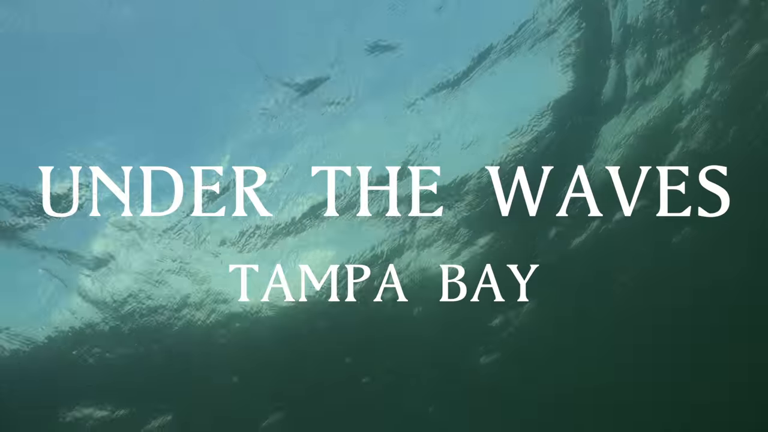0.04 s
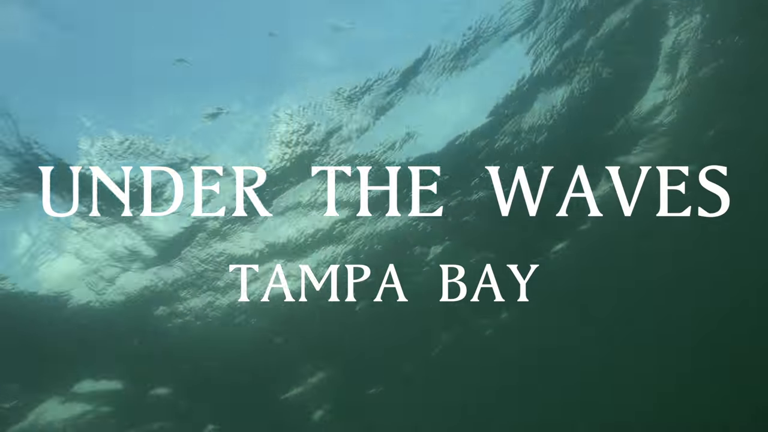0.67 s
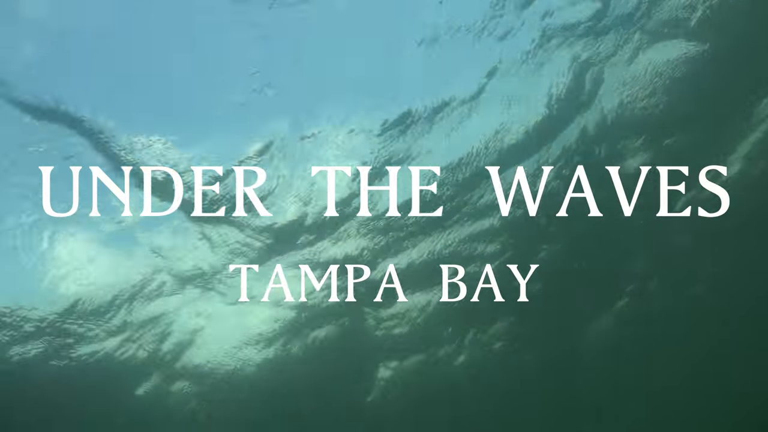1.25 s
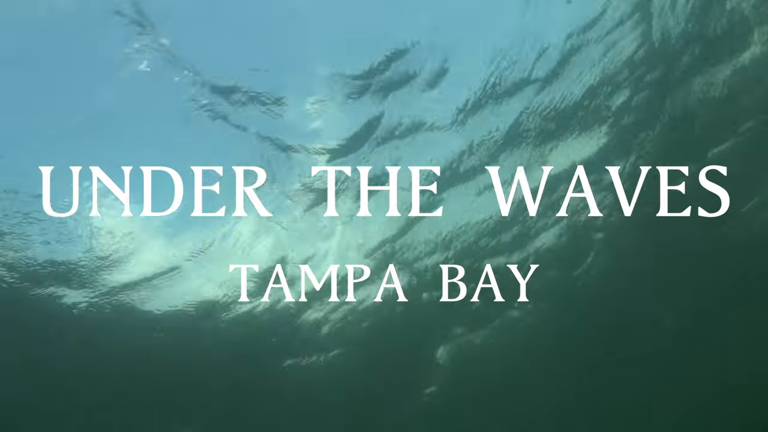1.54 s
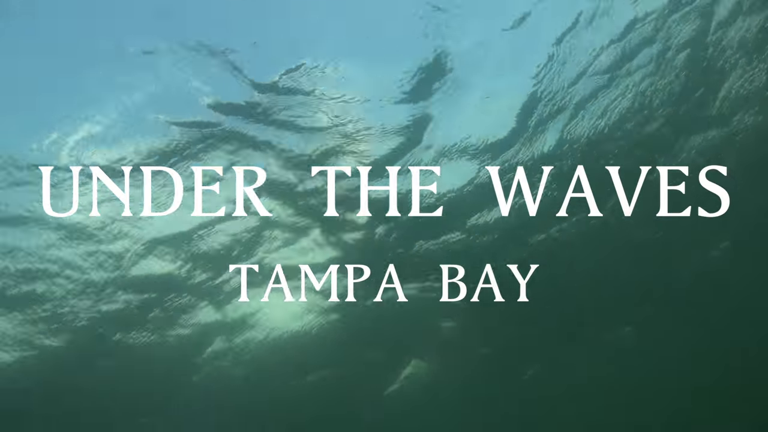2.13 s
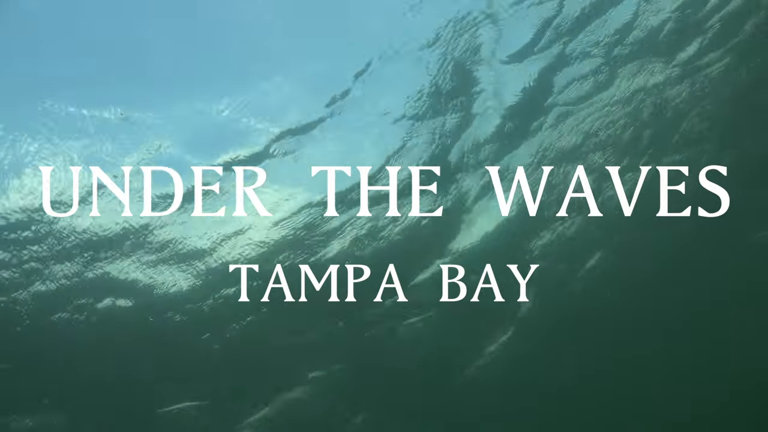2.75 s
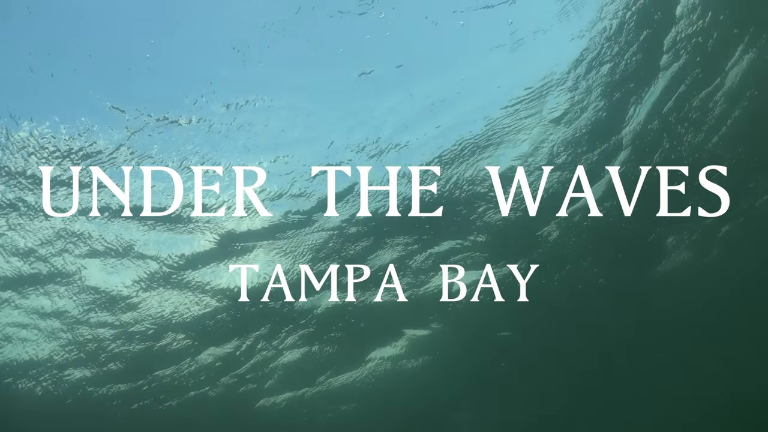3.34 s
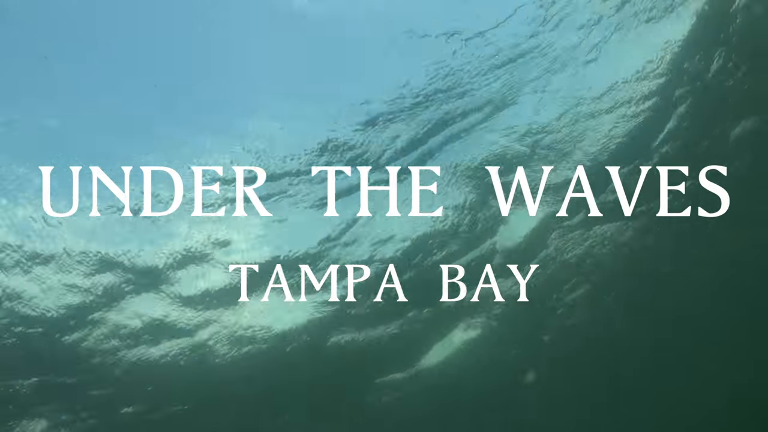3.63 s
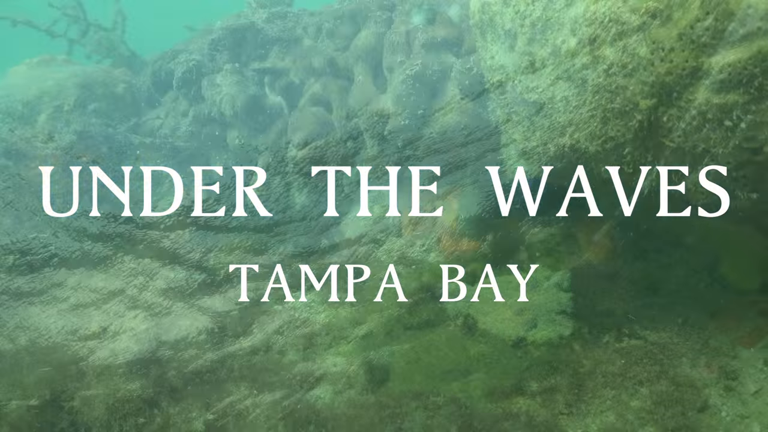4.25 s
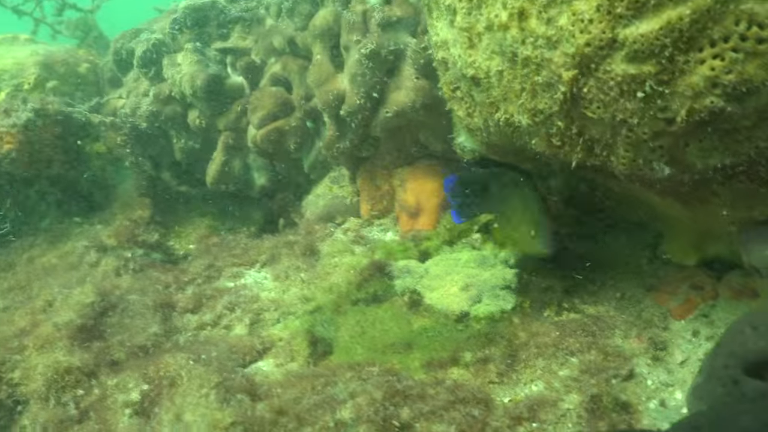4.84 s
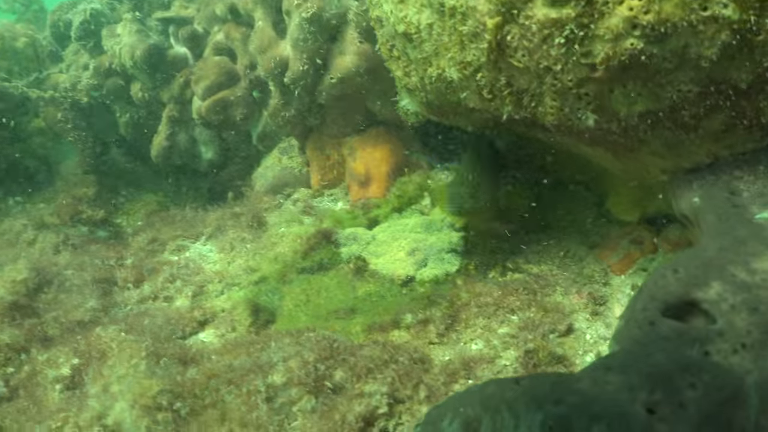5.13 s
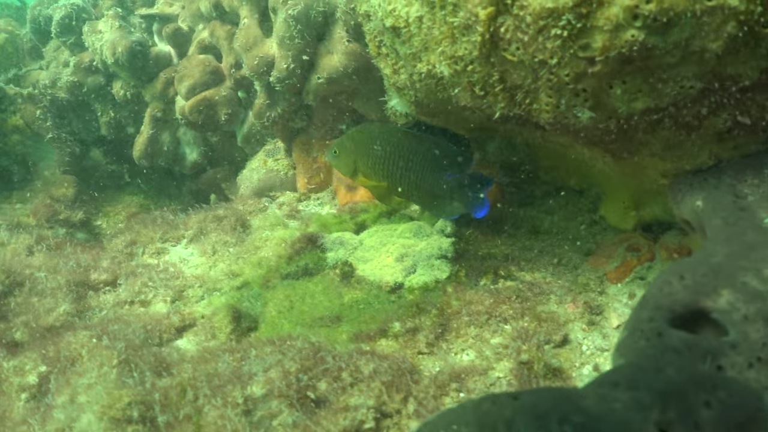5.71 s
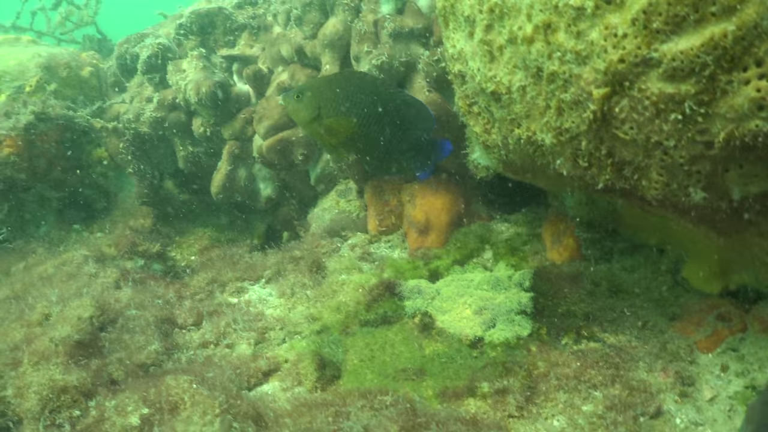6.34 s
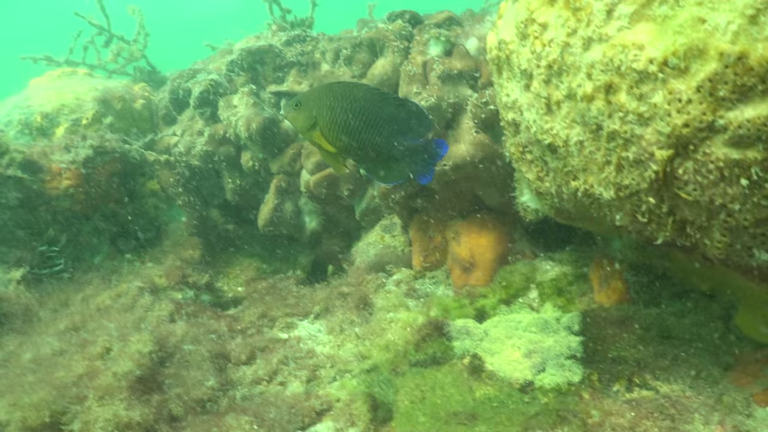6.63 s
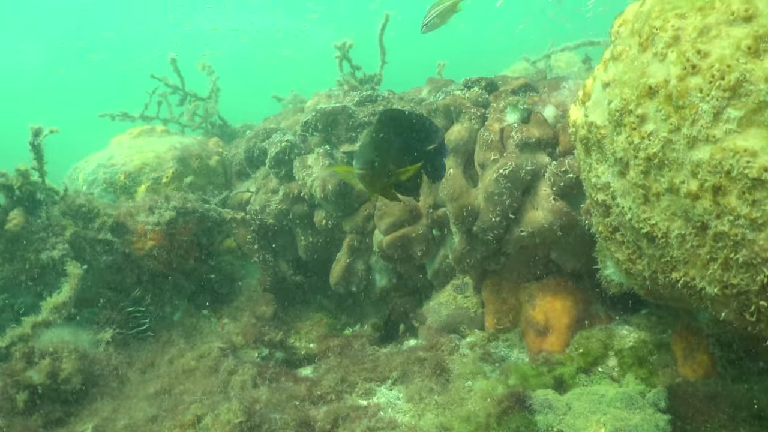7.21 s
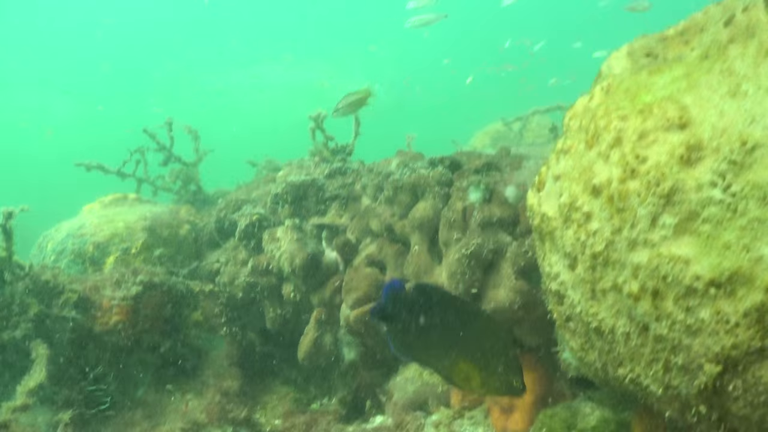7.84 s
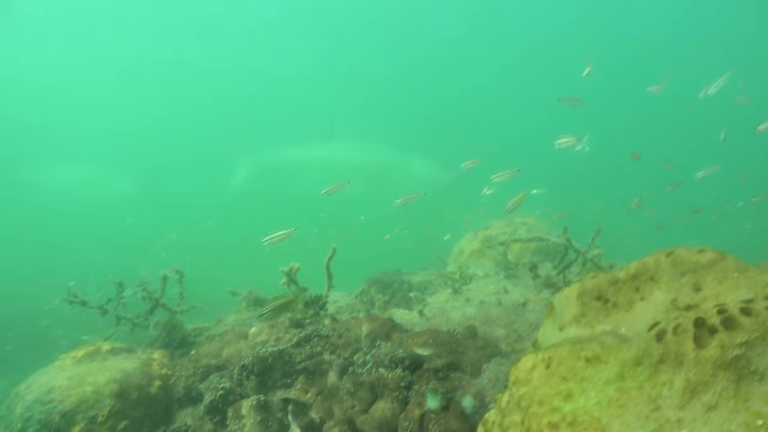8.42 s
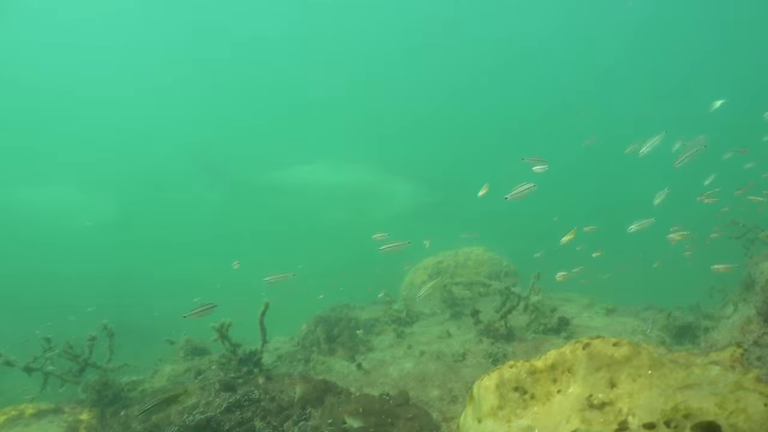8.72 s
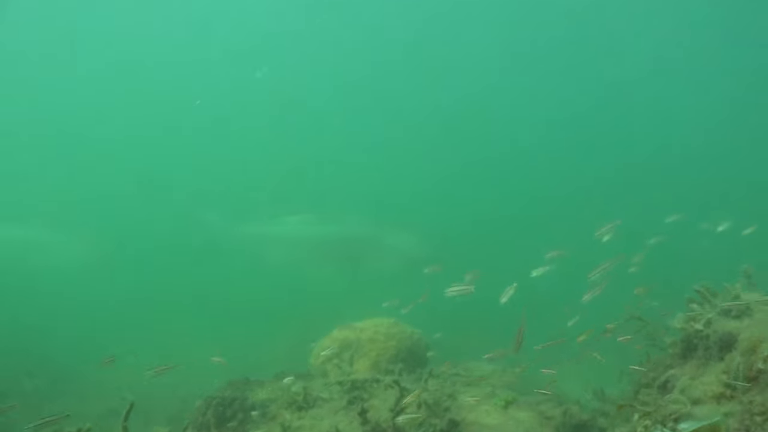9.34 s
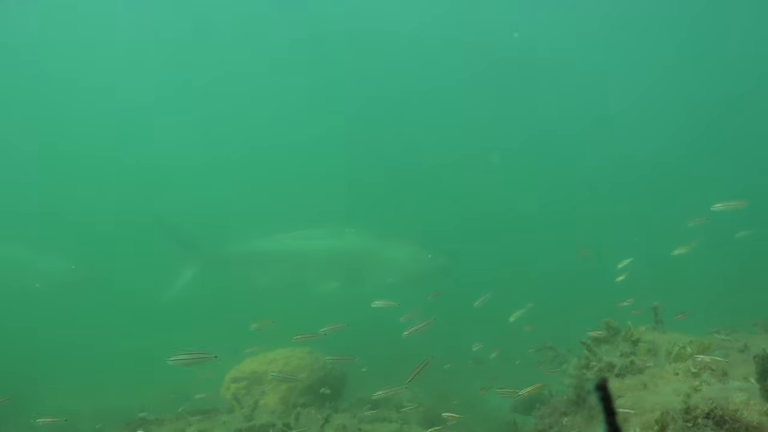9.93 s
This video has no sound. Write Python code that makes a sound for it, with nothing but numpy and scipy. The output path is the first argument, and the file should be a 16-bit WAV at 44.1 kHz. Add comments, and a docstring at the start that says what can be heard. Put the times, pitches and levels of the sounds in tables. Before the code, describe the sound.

Under water beside a reef, snapping shrimp make a dense, fizzing crackle with sharp clicks close by. Water churns softly beneath it, while a camera lens motor hums and flutters faintly in short runs. Just before halfway the crackle abruptly gets quieter and single loud snaps stand out. A thin hiss comes on briefly, and there are a few dull bumps. The microphones sit inside a sealed housing that rings slightly with each snap.

```python
"""Under water beside a reef, snapping shrimp crackle all round a camera in a sealed housing.
Each snap is a collapsing bubble that rings the housing, and its two microphones hear the ring differently.
Water churns, a motor hums, and the lens motor flutters once a frame; now and then comes a dull bump.
The first scene lies just below the waves, in a dense fizz. At 4.41 s it cuts to the quieter sea bed,
where single near snaps stand out, the walls ping faintly and a thin hiss comes on for half a second."""
import sys
import numpy as np
from scipy import signal
from scipy.fft import rfft, irfft, next_fast_len
from scipy.io import wavfile
from scipy.ndimage import uniform_filter1d

SR = 44100
rng = np.random.default_rng(int(sys.argv[2]) if len(sys.argv) > 2 else 0)


def file_out(sig):
    """Save sig as 16-bit WAV at sys.argv[1]."""
    # one column per channel
    cols = np.atleast_2d(sig).T
    # limit, then scale
    lim = np.clip(cols, -1, 1)
    pcm = np.round(lim * 32767).astype(np.int16)
    wavfile.write(sys.argv[1], SR, pcm)


N = 439677
TIME = np.arange(N) / SR
START_S, CUT_S = .04, 4.41  # the sound opens; the scene cuts to the sea bed


def undb(db):
    """Decibels to gain."""
    return 10 ** (np.asarray(db) / 20)


def level(x, db):
    """Set the rms level."""
    return x * undb(db) / np.sqrt(np.mean(x ** 2))


def by_place(pair_db, below_waves):
    """Gain that takes the first level below the waves and the second at the sea bed."""
    return undb(pair_db[1] + below_waves * (pair_db[0] - pair_db[1]))


def walk(rate_hz):
    """Smooth random drift with a spread near 1."""
    hold = int(SR / rate_hz)
    stairs = np.repeat(rng.standard_normal(N // hold + 1), hold)
    return 1.3 * uniform_filter1d(uniform_filter1d(stairs, hold), hold)[:N]


def clicks(times, sizes):
    """Single impulses at the given moments."""
    return np.bincount((np.abs(times) * SR).astype(int), sizes, N)[:N]


def bins(size=4096):
    """Frequency axis of the filters, in Hz."""
    return np.arange(size // 2 + 1) * SR / size


def eq(points):
    """Gain of an EQ curve drawn through points of f/Hz, level/dB."""
    hz, db = np.transpose(points)
    return undb(np.interp(np.log(bins() + 1), np.log(hz), db))


def bell(hz, octaves):
    """A bell of unit height on the log-frequency axis."""
    return np.exp(-(np.log2((bins() + 1) / hz) / octaves) ** 2)


def through(pair, gain):
    """Play a stereo pair through a resonant body: minimum phase, so a sharp attack and then the ring."""
    cepstrum = irfft(np.log(np.atleast_2d(gain) + 1e-6))
    half = cepstrum.shape[-1] // 2
    cepstrum[..., 1:half] *= 2
    cepstrum[..., half + 1:] = 0
    ring = irfft(np.exp(rfft(cepstrum)))
    return signal.fftconvolve(pair, ring, axes=-1)[:, :pair.shape[1]]


def mic_pair(pair, alike=0.61, apart_hz=3600):
    """Two unrelated signals become a microphone pair: alike in the lows, wide in the treble."""
    count = pair.shape[1]
    size = next_fast_len(count + count % 2)
    left, right = rfft(pair, size)
    share = alike / (1 + (bins(size) / apart_hz) ** 4)
    left = share * right + np.sqrt(1 - share ** 2) * left
    return irfft(np.array([left, right]), size)[:, :count]


def left_mic(edge_hz=11200, leak_db=-17):
    """The left microphone loses the highest treble."""
    return np.sqrt(1 / (1 + (bins() / edge_hz) ** 40) + undb(2 * leak_db))


def panned(pan_db):
    """Stereo gains of unit mean power; pan is always left minus right."""
    return level(undb(np.array([[pan_db], [0]])), 0)


def wash(points, pan_db, alike):
    """Stereo noise of about unit level, coloured by an EQ curve."""
    noise = mic_pair(rng.standard_normal((2, N)), alike)
    return level(through(noise, eq(points)), 0) * panned(pan_db)


# Housing resonances and how hard each layer drives them:
# f/Hz, width/Hz, pan/dB, near snaps/dB, chorus below the waves/dB, chorus at the sea bed/dB
HOUSING_MODES = [(475, 56, -6, -8.5, -30, -28), (608, 185, -10.5, -17, -17.5, -14),
                 (730, 28, -50, -34, -12, -4), (845.5, 64, -15, -3.5, -10.5, -6.5),
                 (1164, 440, -13, -17, -13.5, -8.5), (1284, 61, -24, 1, 0.5, -0.5),
                 (1539, 90, -13, -3, -2, -0.5), (1636, 620, -7.5, -8, -28, -21),
                 (1958, 97, -33, 1.5, -9, -7), (2108, 83, -5.5, -7.5, -11.5, -8.5),
                 (2344, 115, -12.5, -9.5, -5, -8.5), (2610, 144, -29, -1.5, -10, -7.5),
                 (2854, 210, -9, -0.5, -8.5, -9), (3440, 336, -17.5, 2.5, -9, -12),
                 (3634, 120, -21, -2, -9.5, -12), (3917, 220, -11.5, -3.5, -8, -16),
                 (4275, 220, -37, -3, -10, -12), (4673, 135, -19.5, 2, -6.5, -6.5),
                 (5230, 590, -10.5, -5.5, -9.5, -11.5), (5940, 300, -26, -4, -7.5, -10.5),
                 (6710, 1420, -6, -8.5, -11, -11.5), (8130, 1760, 8, -18, -18.5, -21),
                 (9600, 3100, 4, -21, -21, -23.5), (12820, 3460, -43, -16, -15.5, -17.3),
                 (14300, 150, 13, -26, -44, -60)]
def housing(column, bass_hz=330):
    """Left and right tone of the ringing housing, driven as the chosen column says, bass rolled off."""
    modes = np.array(HOUSING_MODES, float)
    hz, width_hz, pan_db = modes[:, :3].T
    drive_db = modes[:, column]
    peaks = 1 / (1 + ((bins()[:, None] - hz) / (0.59 * width_hz)) ** 2) ** 2
    left = np.sqrt(peaks @ undb(drive_db + pan_db) ** 2) * left_mic()
    right = np.sqrt(peaks @ undb(drive_db) ** 2)
    return np.array([left, right]) * bins() / np.hypot(bins(), bass_hz)


def ticks(per_s, spread_db, fizz_db, scatter_s):
    """Random far snaps of uneven size, the furthest merging into a fizz."""
    when, rank = rng.random((int(per_s * N / SR), 2)).T
    sizes = undb(spread_db * np.minimum(-np.log(1 - rank), 3.6))
    hits = np.bincount((when * N).astype(int), sizes ** 2, N)
    decay = np.exp(-2 * np.arange(1024) / SR / scatter_s)
    power = np.abs(signal.fftconvolve(hits, decay)[:N])
    return rng.standard_normal((2, N)) * np.sqrt(power / power.mean() + undb(2 * fizz_db))


def chorus(body, per_s, spread_db, fizz_db, scatter_s, directions=7):
    """Countless far shrimp ring the housing; each direction gives its ticks another pitch."""
    colours = np.array([.16 + bell(hz, .5) for hz in np.geomspace(2700, 11500, directions)])
    colours /= np.sqrt(np.sum(colours ** 2, axis=0))
    out = 0
    for colour in colours:
        crackle = mic_pair(ticks(per_s / directions, spread_db, fizz_db, scatter_s))
        out = out + through(crackle, body * colour)
    return level(out, 0)


# Fader ride of the sea-bed crackle, in two stretches, before each layer's own trim: t/s, level/dB
CRACKLE_RIDE = [
    [(4.44, -58), (4.586, -56.5), (4.958, -50.5), (5.296, -55), (5.744, -54), (6.25, -53)],
    [(6.85, -55), (7.17, -55.5), (8.53, -52.5), (9.25, -53), (9.66, -51.5), (9.95, -53.5)],
]
def sea_bed_swell():
    """Gain of the distant crackle as it ebbs and swells at the sea bed."""
    times, db = np.vstack(CRACKLE_RIDE).T
    return undb(np.interp(TIME, times, db))


def distant_shrimp(below_waves, shallow_db=-43.5, deep_trim_db=3):
    """A dense, steady crackle below the waves, a sparser one at the sea bed."""
    shallow = chorus(housing(column=4), per_s=900, spread_db=4.9, fizz_db=-6.5, scatter_s=.0032)
    deep = chorus(housing(column=5), per_s=400, spread_db=5.3, fizz_db=-5.5, scatter_s=.0034)
    shallow *= undb(shallow_db)
    deep *= sea_bed_swell() * undb(deep_trim_db)
    return below_waves * shallow + (1 - below_waves) * deep


# Surges of water against the housing: middle t/s, length/s, churn level/dB, rumble level/dB
WATER_SURGES = [(1.7, 0.23, -65, -67), (2.23, 0.88, -61, -78), (5.668, 0.16, -74, -67),
                (7.902, .35, -81, -66.5), (8.58, 0.52, -71, -69), (9.45, 0.55, -71, -74)]
def surging(steady, column, drift_db=3.0):
    """Gain of a water layer: surges swell and ebb over a steady floor, and the whole drifts."""
    power = steady ** 2
    for surge in WATER_SURGES:
        middle_s, length_s = surge[:2]
        power = power + undb(surge[column]) ** 2 * np.exp(-(2 * (TIME - middle_s) / length_s) ** 2)
    return np.sqrt(power) * undb(drift_db * walk(7.2))


def water(below_waves, churn_db=(-69.5, -71.5), rumble_db=(-76.5, -75)):
    """Water washes, churns and rumbles round the housing and keeps a low resonance droning."""
    flow = wash([(100, -7.5), (200, -4.5), (300, 3), (470, 4.5), (700, -7), (1200, -18.5)], 0.38, 0.12)
    flow *= undb(-69.5 + 3.8 * walk(2.98))
    churn = wash([(50, -19), (100, -4), (160, 3), (230, -1.5), (400, -22.5)], -1.6, 0.018)
    churn *= surging(by_place(churn_db, below_waves), column=2)
    rumble = wash([(12, -30), (35, -4.5), (70, -6.5), (110, -14), (220, -38)], -7.5, 0.37)
    rumble *= surging(by_place(rumble_db, below_waves), column=3)
    drone_eq = [(600, -30.5), (760, -7), (815, 7.5), (880, 6.5), (950, -10), (1150, -28.5)]
    drone = wash(drone_eq, -10.5, 0.96) * undb(-57.5 + 2 * walk(5.4))
    return flow + churn + rumble + drone


# Tone of one lens step ringing the housing: f/Hz, level/dB
STEP_EQ = [(150, -29), (240, -20), (300, -12.5), (370, -1), (425, -7.5), (465, 8.5), (520, -13), (615, 6.5),
           (700, -6), (840, 9), (980, -4.5), (1300, -0.5), (1560, -4.5), (2000, -21)]
FRAME_HZ = 23.976
def lens_steps(frame_phase, running, rattle_db=-6, rattle_s=.008):
    """One knock a frame, slightly loose in time and strength, and a short rattle ring the housing."""
    times = TIME[1:][np.diff(frame_phase) < -.5]
    late, strength = rng.standard_normal((len(times), 2)).T
    knocks = level(clicks(times + .0012 * late, undb(1.5 * strength)), 0)
    rattle = mic_pair(rng.standard_normal((2, N))) * level(np.exp(-frame_phase / FRAME_HZ / rattle_s), 0)
    drive = (knocks + undb(rattle_db) * rattle) * running
    return through(drive, level(eq(STEP_EQ), 0)) * panned(-13.5)


# Partials of the running motor: multiple of the turning rate, relative level/dB
BUZZ_PARTIALS = [(5, -21.5), (6, -22), (8, -20), (9, -16), (10, -18), (11, -5), (15, -14.5)]
def lens_buzz(turn_hz=41.6):
    """The turning motor buzzes in harmonics that waver a little in pitch and level."""
    turns = np.cumsum(turn_hz * (1 + .004 * walk(14))) / SR
    return sum(np.sin(2 * np.pi * (multiple * turns + rng.random())) * undb(db + 2 * walk(10))
               for multiple, db in BUZZ_PARTIALS)


# Runs of the lens motor: start t/s, end t/s, drive level/dB
MOTOR_RUNS = [(0.034, 0.92, -58.5), (2.025, 2.405, -60), (3.383, 4.42, -58), (4.47, 4.93, -55.5),
              (7.17, 7.3, -61), (7.28, 7.69, -55.5)]
def lens_motor(below_waves, idle_db=(-67.5, -70), run_whirr_db=(-4.5, -11), buzz_db=(2, -14)):
    """The lens motor whirrs in two soft beats a frame; in a run it whirrs louder, steps and buzzes."""
    step_phase = np.where(TIME < CUT_S, .2, .32)  # where in the frame the step lands
    frame_phase = (TIME * FRAME_HZ - step_phase) % 1
    beats = .6 + .4 * np.cos(4 * np.pi * (frame_phase - .06))
    running = sum(undb(db) * np.clip(np.minimum(TIME - start, end - TIME) / 0.038, 0, 1)
                  for start, end, db in MOTOR_RUNS)
    steps = lens_steps(frame_phase, running)
    buzz = lens_buzz() * running * by_place(buzz_db, below_waves)
    whirr = wash([(150, -25), (240, -16), (300, -11.5), (370, -1.5), (460, 10), (500, -5),
                  (610, -6.5), (900, 1), (1400, -34)], 0.4, 0.59)
    idle = by_place(idle_db, below_waves) * undb(5.7 * walk(2.14))
    effort = idle + running * by_place(run_whirr_db, below_waves)
    return steps + whirr * beats * effort + buzz


# Tones of the motor hum: f/Hz, level below the waves/dB, level at the sea bed/dB, pan/dB
HUM_TONES = [(207, -74, -93, -29), (248.5, -72, -80, -36), (329, -75, -86, -6), (370, -74.5, -83.5, -2),
             (420, -71, -95, 3), (470.4, -67.5, -75, 3)]
def motor_hum(below_waves):
    """A faint motor whose tones waver in pitch and strength."""
    out = 0
    for hz, shallow_db, deep_db, pan_db in HUM_TONES:
        phase = 2 * np.pi * np.cumsum(hz * (1 + .012 * walk(24))) / SR
        waver = undb(3.5 * walk(16) + 2 * walk(3))
        out = out + np.sin(phase) * by_place((shallow_db, deep_db), below_waves) * waver * panned(pan_db)
    return out


# Foreground shrimp snaps; body, wood and treble are EQ against the presence band at 3800 Hz:
# t/s, level before trim/dB, body/dB, wood/dB, treble/dB, pan/dB, ring f/Hz, ring lift/dB, notch f/Hz
NEAR_SNAPS = [(0.2514, -38.5, 1, 7, 6, -7, 4350, 6.5, 1070), (0.3027, -40, 10, 3, 8, -7, 2350, 15, 14730),
              (0.3425, -39.5, 10, 7, 14, -4.0, 940, 12, 1640),
              (0.4793, -32.5, -11, 6, 15, -1, 7850, 2.6, 11300),
              (0.6076, -43, -15, 12, 1, -11.5, 4480, 11, 7440), (0.647, -40, -4, 5, 18, -6, 5580, 6, 8190),
              (0.7114, -39.5, -12, -5, 15, -7, 5780, 8, 2140),
              (0.7775, -41.5, 17, 15, -5, -15, 2750, 4.7, 1580),
              (0.9483, -42.5, -7, -7, 19, -6.0, 5960, 7, 14920),
              (1.0735, -38, -1, -2, 7, -4, 1440, 10, 6410), (1.108, -45.5, 17, 0, 13, -6.5, 2330, 7, 910),
              (1.3135, -39.5, 10, -11, 13, -3, 2260, 17, 12120),
              (1.383, -43, -15, -5, 4, -3.5, 5970, 8, 4960),
              (1.5565, -45, 15, -21, 8, -9.5, 5580, 6.6, 8460),
              (1.722, -31.5, 2.5, -5, 5, -4, 2890, 11.3, 840),
              (1.8459, -21, 9, 9, 12, -6.5, 4050, 14.3, 870),
              (2.0295, -34.5, -19, -6, 18, 0, 7900, 2.5, 11500),
              (2.1032, -39, 7, -10, 10, -6, 1200, 12, 1080),
              (2.27, -34, -2, -13.5, -2, -9.0, 2230, 12, 3260), (2.37, -37, 0, 0, 7, -6, 3440, 5.1, 4600),
              (2.3842, -39, -7, -12, 10, -8.0, 6270, 7, 9480), (2.409, -42, 24, 22, -6, -9, 1450, 8, 870),
              (2.4331, -31.5, 15.5, 3, -4, -12, 1280, 7.8, 905),
              (2.5168, -45, -16, -15, 1, -8, 5370, 5, 3310), (2.7183, -37.5, -5, 3, 2, -5, 5200, 6.2, 770),
              (2.7316, -32, -7, -3, 8.5, -9, 5190, 7.5, 8310),
              (2.7784, -35, -20, -15, 7, -5, 1190, 8.9, 7340), (2.8455, -39, 4, 6, 14, -3.0, 1300, 6, 1570),
              (3.054, -34.5, -4.5, -9, -0.5, -9, 7540, 5, 9930),
              (3.1294, -36.5, 4.5, -5, 3.5, -7, 1250, 7, 1950),
              (3.2644, -36.5, -10, -10, -2, -11, 12290, 10, 15070),
              (3.3918, -38.5, -5, 2, 8, -3.0, 1280, 15, 1520),
              (3.522, -42.5, -12, -21, 6, -6.0, 2330, 10, 7190),
              (3.8053, -33.5, 2, 10.5, 6.5, -6, 1160, 8, 1840),
              (3.8303, -43.5, 7, 4, 3, -11.5, 5940, 21, 850),
              (3.9429, -38, -12, -4, 7, -5.5, 6100, 7.1, 2160),
              (4.0797, -36.5, -14, -4, 6, -2, 4670, 4, 11000),
              (4.0912, -36, -9, 5, 10, -3, 4410, 6.4, 6220), (4.1263, -34, -4, -4, -1, -7, 5490, 5.4, 1730),
              (4.2203, -31, -1, -3, 2.5, -6.5, 4050, 4.3, 12390),
              (4.3246, -36, 13, 19, 13, -5.5, 1090, 18, 1770),
              (4.3684, -33, -13, 4, 16, -8, 5970, 6.4, 8500),
              (4.3923, -35.0, -9, -8, -5.5, -7, 5830, 7, 4720),
              (4.5715, -44.5, -15, -15, 2, -4.5, 6030, 9.7, 9020),
              (4.7702, -48, 0, -9, 16, 0, 4650, 6, 14820), (4.8914, -34.5, 20, 21, 10, -9, 4940, 9.3, 1660),
              (4.9288, -19, 14, 16.5, 8, -8, 4570, 3.6, 3100),
              (4.952, -40.5, 18, -1, 7, -7.5, 5060, 9, 1130),
              (5.0356, -23.5, -0.5, 9.5, 4, -8, 5400, 8.4, 6310),
              (5.1352, -44.5, -13, 2, -1, -7, 10940, 7, 5630),
              (5.26, -44.5, -12, -10, 18, -4, 5200, 5.1, 9000),
              (5.467, -21, -5.5, 8, 7.5, -8.5, 9160, 4.9, 7630),
              (5.545, -45, 11, -16, 19, 2.0, 10600, 9, 6720),
              (5.7082, -35.5, 4, 5, 2.5, -5, 9790, 7.3, 1680),
              (5.7514, -45.5, -13, -21, -1, -9, 11340, 6, 13220),
              (5.8576, -24.5, -2.5, 4, 1, -4, 7600, 11, 5700),
              (5.907, -45.5, -5, -15, 2, -13, 4690, 9.5, 3410),
              (5.9801, -32, -4.5, 1, 6.5, -4.5, 11470, 3.7, 770),
              (6.0722, -37, -5, -13, 7, -9, 4800, 10, 11180), (6.12, -37, 2, 3, 3, -7.5, 6400, 9, 15100),
              (6.2075, -42.5, -20, -19, -8, -7, 8230, 11, 6570),
              (6.4745, -44, -2, 3, 4, -8.5, 3400, 6, 5500), (6.4855, -45.5, 6, 3, 0, -11, 3400, 5, 5500),
              (6.5058, -35, 0, 11, 7, -9.0, 1200, 10, 11730),
              (6.6912, -46.5, -7, -10, 2, -8, 3500, 8, 5500),
              (6.7765, -43, -10, -12, 9, -1.5, 9400, 5.2, 4470),
              (6.9255, -45.5, 15, 0, 22, 4, 1570, 7, 13420), (7.0882, -41, -3, 5, 7, -7, 4070, 11, 5490),
              (7.2712, -41.0, -20, -5, 7, -4, 12840, 5.4, 11130),
              (7.4304, -39.5, -2, 14, 3, -9, 3140, 9, 1850), (7.439, -48, 12, 3, 10, 1, 840, 15, 1740),
              (7.5016, -20.5, -7, -1, -6, -10.5, 10520, 8.3, 1190),
              (7.591, -38.5, -7, -6, 5, -6.5, 4680, 9.7, 13880),
              (7.7669, -43.5, 1, -3, -9, -16, 3090, 12, 1300),
              (7.8091, -21, -2.5, -3, -1.5, -6, 8000, 7.9, 6270),
              (8.0276, -33, -18, -6, 15, -2.5, 3450, 24, 5070),
              (8.1161, -44, -5, -11, 8, -7, 5520, 10, 2530),
              (8.2073, -46.5, -12, -5, 10, -1.5, 1260, 12, 13500),
              (8.2554, -40.5, -3, -12, 7, -2, 10210, 13, 9000),
              (8.335, -43, -13, 2, 9, -2.0, 10480, 7, 15460), (8.392, -42, 6, -1, 10, -5, 5790, 6, 10900),
              (8.4043, -27.5, -4, -1, 15, -1.5, 3160, 9.9, 10700),
              (8.4346, -35.5, -2, 7, 11, -6, 3010, 14, 11510),
              (8.4598, -44.5, -2, -6, 8, -2, 7540, 6, 1290),
              (8.5272, -41.5, -10, -7, 7, -4, 6400, 9.5, 7060),
              (8.6602, -38, -9, -11, -2, -11, 3280, 5.5, 6550),
              (8.6946, -42, -20, -8, -2, -15.0, 3380, 5.9, 2670),
              (8.7636, -26.5, 0, 0, -7.5, -11, 6500, 4.7, 14960),
              (8.9371, -34, 9, 13.5, 3.5, -6.5, 8930, 17, 8140),
              (9.0058, -41.5, 4, -1, 19, 0, 4640, 8, 6830), (9.0155, -42.5, -7, -1, 7, -9, 4670, 8.2, 1500),
              (9.2323, -41.5, -7, 0, 33, -6, 13370, 9, 7260),
              (9.2475, -50, -7, 3, 22, -4.5, 13000, 6, 7000), (9.4535, -45, -13, -8, 16, -1, 6000, 6, 2100),
              (9.2783, -34, -16, -18, 6, -7, 6390, 9.6, 8000),
              (9.3707, -45.5, -2, -10, 8, -9.5, 5560, 11, 9560),
              (9.4743, -39.5, -11, -22, 8, -3.5, 14670, 4, 1390),
              (9.5147, -41, -8, 1, 2, -12, 3360, 3.9, 8190),
              (9.5342, -36.5, -11, -10, 4, -6.0, 5730, 7, 12700),
              (9.6313, -32, -15, -1, 25.5, -0.5, 990, 4, 6950),
              (9.728, -33, -25, -5, -0.5, -12, 2900, 4.4, 8920),
              (9.86, -26, 7, 3.5, 4.5, -6, 3090, 6.2, 1350)]
def shrimp_snaps(rows, trim_db=1.26, notch_db=-12, size=4096):
    """A cavitation bubble collapses: a sharp crack, scattered by rock and housing walls, then the ring."""
    out, t = np.zeros((2, N + size)), np.arange(size) / SR
    shell = housing(column=3)
    reef_tail = undb(-14) * np.exp(-t / .0105)
    attack = np.minimum(t / .0012 + .2, 1)
    release = np.exp(-(t / .055) ** 4)
    head = int(.017 * SR)  # the first 17 ms set a snap's level
    for s, db, body_db, wood_db, treble_db, pan_db, ring_hz, ring_db, notch_hz in rows:
        noise, start = rng.standard_normal((2, size)), int(s * SR)
        if start >= N:
            continue
        # early reflections smear longer for a fuller snap and for a weaker one, which is further off
        scatter_s = 0.004 * 2 ** (body_db / 40 + (-20.5 - db) / 24.5)
        reflections = attack * np.exp(-(t / scatter_s) ** 1.5)
        crack = mic_pair(noise * (reflections + reef_tail))
        # the crack itself holds all pitches evenly
        flatten = uniform_filter1d(uniform_filter1d(np.abs(rfft(crack)) ** 2, 45), 31) ** -.5
        colour = eq([(200, body_db - 17), (600, body_db - 8.5), (820, body_db), (1300, body_db),
                     (2100, wood_db), (3800, 0), (7500, treble_db), (10000, treble_db - 1)])
        # the direction of arrival favours one resonance, and a close reflection notches another band
        path = undb(ring_db * bell(ring_hz, 0.18) + notch_db * bell(notch_hz, 0.22))
        snap = through(crack, flatten * shell * colour * path) * release
        snap /= np.sqrt(np.mean(snap[:, :head] ** 2, axis=1, keepdims=True))
        out[:, start:start + size] += snap * undb(db) * panned(pan_db)
    return out[:, :N] * undb(trim_db)


# Mid-distance snaps, one row for each column of NEAR_SNAPS after t/s, in its unit: mean, spread
STRAY_TRAITS = [(-50.5, 0.67), (-2, 6.2), (-6, 5), (4.5, 4.4), (0, 3), (4500, 1220), (2.5, 1.1),
                (7500, 2800)]
def stray_snaps(count=80, per_s=4.5):
    """Shrimp in the middle distance snap at random, each with its own strength, colour and direction."""
    times = START_S + np.cumsum(rng.exponential(size=count)) / per_s
    mean, spread = np.transpose(STRAY_TRAITS)
    traits = mean + spread * np.clip(rng.standard_normal((count, len(mean))), -2, 2)
    return shrimp_snaps(np.column_stack([times, traits]))


# Dull bumps on the housing: t/s, f/Hz, peak level before trim and pan/dB, decay/s
HOUSING_BUMPS = [(1.575, 120, -53, 0.012), (1.69, 135, -51, 0.016), (1.755, 150, -53, 0.017),
                 (3.359, 280, -49, 0.017), (6.275, 150, -50, 0.022), (6.28, 90, -60, .03)]
def bumps(trim_db=6):
    """Soft, low knocks on the housing that die away quickly."""
    out, t = np.zeros((2, N)), np.arange(SR // 4) / SR
    for s, hz, db, decay_s in HOUSING_BUMPS:
        envelope = t / decay_s * np.exp(1 - 2 * t / decay_s)
        push = mic_pair(rng.standard_normal((2, len(t))), alike=0.52) * envelope
        tone = eq([(hz / 3, -20), (hz / 1.5, -4), (hz, 0), (hz * 1.5, -6), (hz * 3, -32), (hz * 8, -80)])
        thud, start = through(push, tone), int(s * SR)
        out[:, start:start + len(t)] += thud / np.abs(thud).max() * undb(db + trim_db) * panned(-15)
    return out


# The two clearest wall resonances: f/Hz, decay/s, level against the crackle's ride/dB
WALL_MODES = [(3424, 0.0048, -11.5), (4704, 0.0055, -10)]
def wall_pings(below_waves, count=170, spread_db=4.0):
    """Faint ticks at the sea bed ring the walls, each in its own blend; they ebb with the crackle."""
    times = rng.uniform(CUT_S, N / SR, count)
    out, t = 0, np.arange(4096) / SR
    for hz, decay_s, db in WALL_MODES:
        sizes = undb(spread_db * np.clip(rng.standard_normal(count), -2, 2))
        envelope = signal.fftconvolve(clicks(times, sizes), np.exp(-t / .002))[:N]
        scattered = envelope * rng.standard_normal(N)
        ring = np.sin(2 * np.pi * hz * t) * np.exp(-t / decay_s)
        out = out + level(signal.fftconvolve(scattered, ring)[:N], db)
    return out * sea_bed_swell() * (1 - below_waves) * panned(-19)


# Tone of the thin hiss: f/Hz, level/dB
HISS_EQ = [(900, -9.5), (1320, 0.5), (1800, -9), (4700, -7), (5300, -9), (6000, 0.5), (8400, -3.5),
           (9000, -10), (11000, -14), (14000, -6), (15500, -31)]
# Its whistling resonances: f/Hz, width/octaves, lift/dB
HISS_WHISTLES = [(1326, 0.057, 6.7), (7070, .05, 5.5), (8000, .03, 8.7), (13800, .07, 4)]
def hiss(start_s=6.3, end_s=6.8, edge_s=0.016, level_db=-47):
    """A thin, whistling hiss switches on for half a second, its mids over to the right."""
    gate = np.clip(np.minimum(TIME - start_s, end_s - TIME) / edge_s + .5, 0, 1)
    right_tone = eq(HISS_EQ) * undb(sum(db * bell(hz, octaves) for hz, octaves, db in HISS_WHISTLES))
    left_tone = right_tone * left_mic() * eq([(1300, -13), (4500, -19), (6500, -1), (9000, 2)])
    noise = mic_pair(rng.standard_normal((2, N)))
    return level(through(noise, np.array([left_tone, right_tone])), level_db) * gate


def scene():
    """The full mix, with a 10 ms crossfade from below the waves to the sea bed."""
    below_waves = np.clip((CUT_S - TIME) / .01 + .5, 0, 1)
    opening = np.clip((TIME - START_S) / 0.00019, 0, 1)
    snaps = shrimp_snaps(NEAR_SNAPS) + stray_snaps()
    shrimp = snaps + distant_shrimp(below_waves) + wall_pings(below_waves)
    backdrop = water(below_waves) + lens_motor(below_waves) + bumps() + motor_hum(below_waves) + hiss()
    return opening * (shrimp + backdrop)


def record(dry, top_hz=16000):
    """The camera rounds the highest peaks and cuts the top."""
    lowpass = signal.ellip(8, .2, 70, top_hz, fs=SR, output="sos")
    return signal.sosfilt(lowpass, np.tanh(dry))


dry = scene()
out = record(dry)
file_out(out)
```